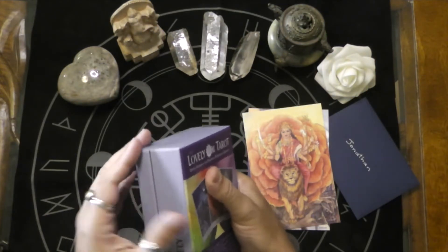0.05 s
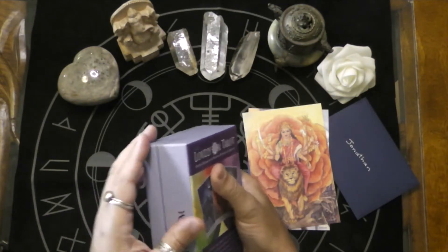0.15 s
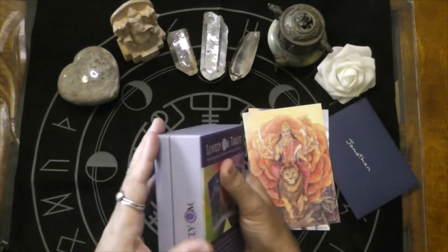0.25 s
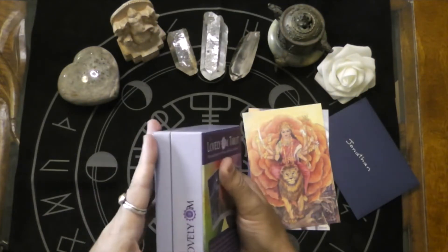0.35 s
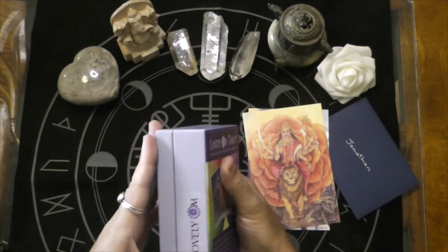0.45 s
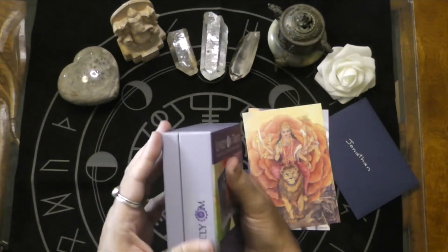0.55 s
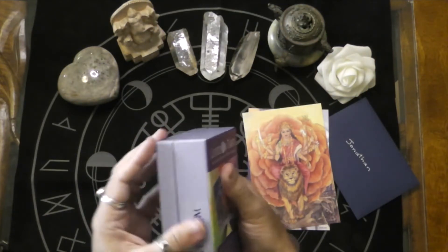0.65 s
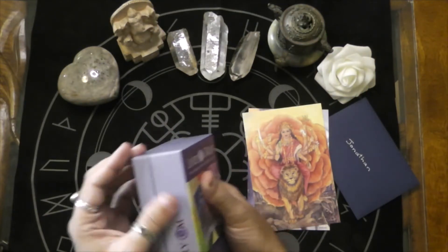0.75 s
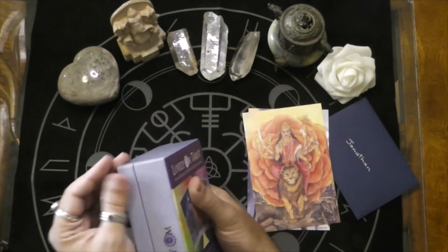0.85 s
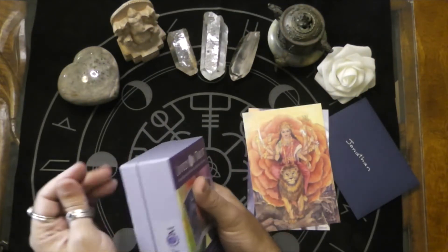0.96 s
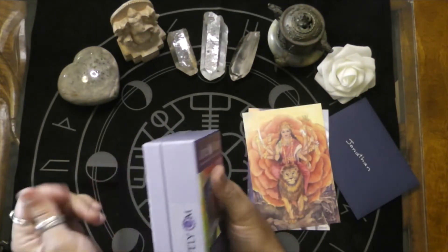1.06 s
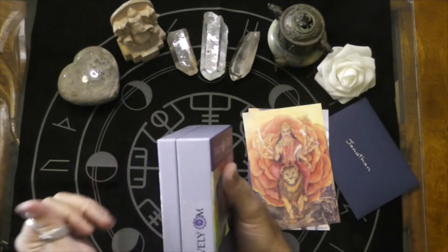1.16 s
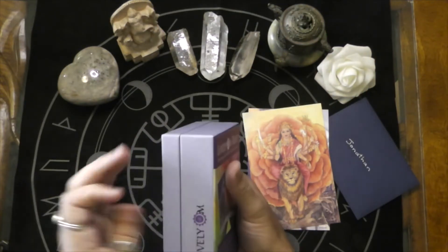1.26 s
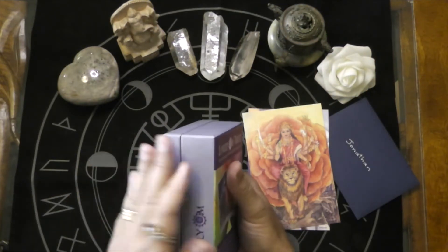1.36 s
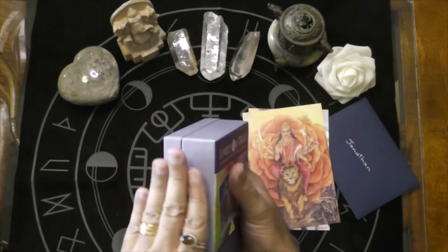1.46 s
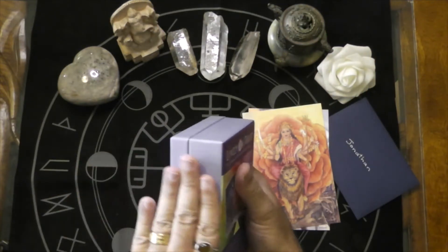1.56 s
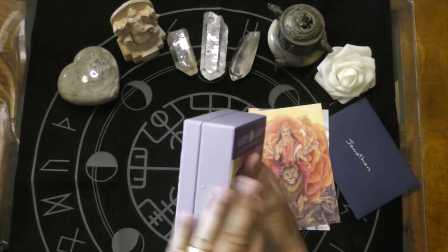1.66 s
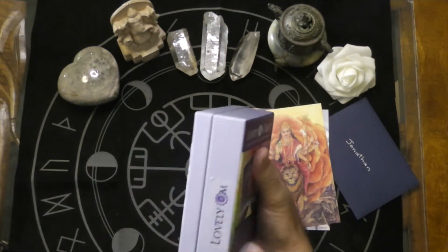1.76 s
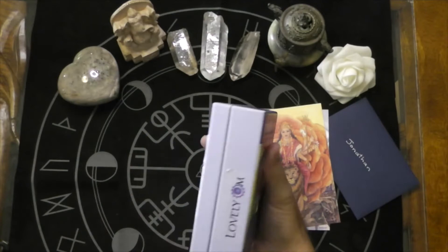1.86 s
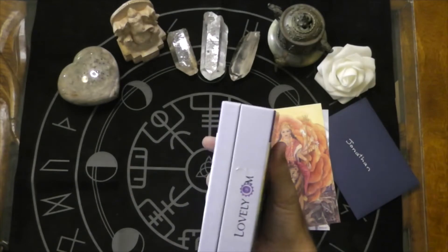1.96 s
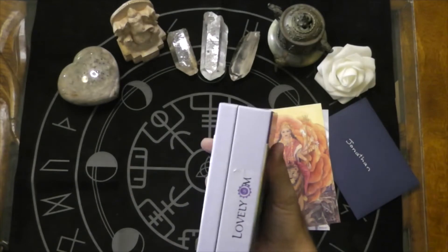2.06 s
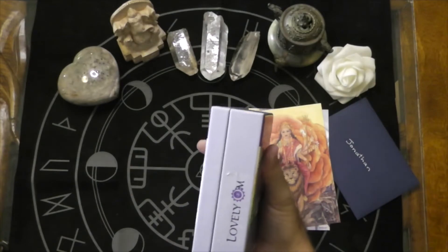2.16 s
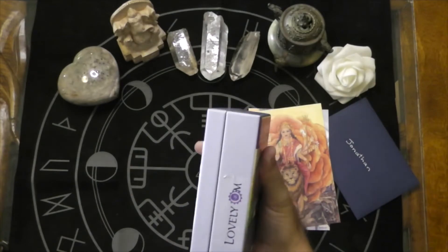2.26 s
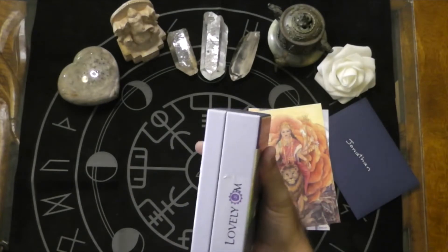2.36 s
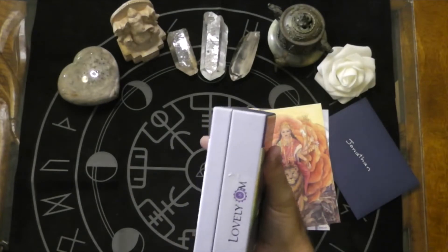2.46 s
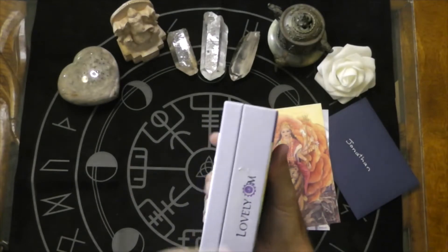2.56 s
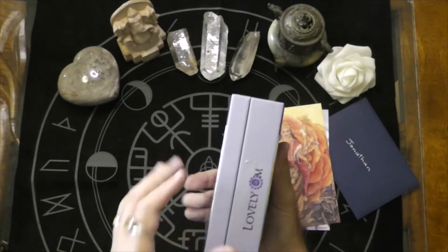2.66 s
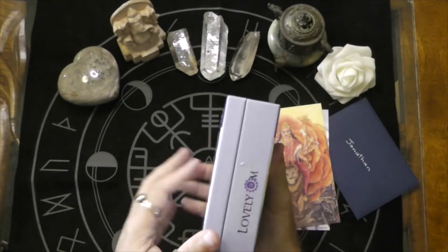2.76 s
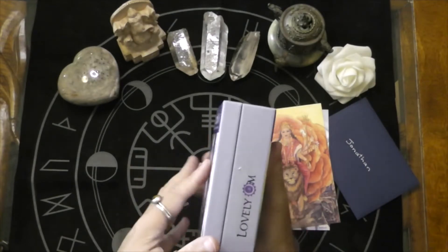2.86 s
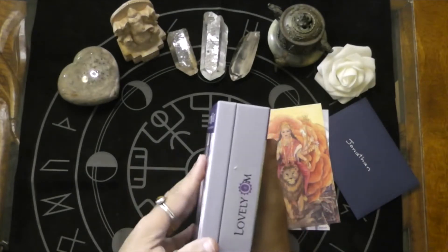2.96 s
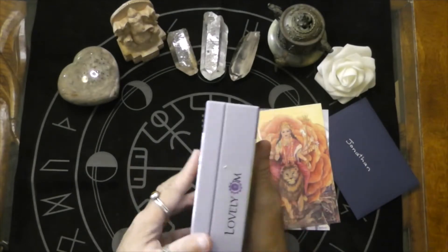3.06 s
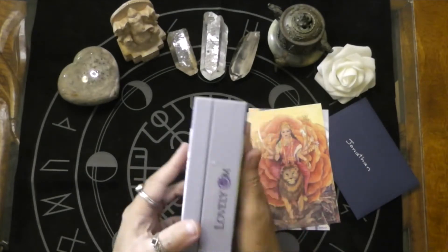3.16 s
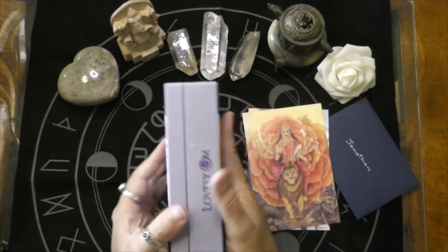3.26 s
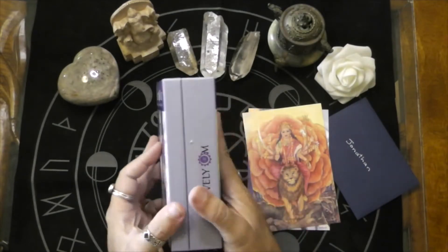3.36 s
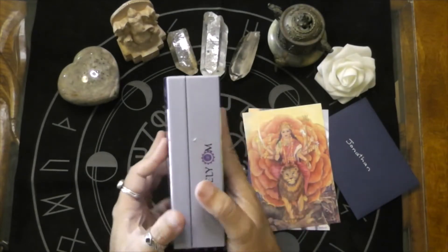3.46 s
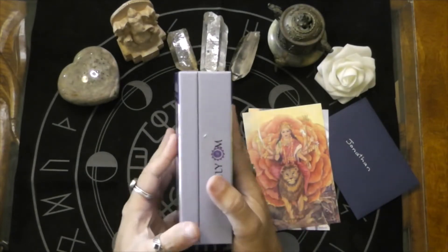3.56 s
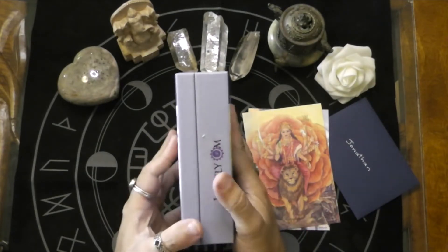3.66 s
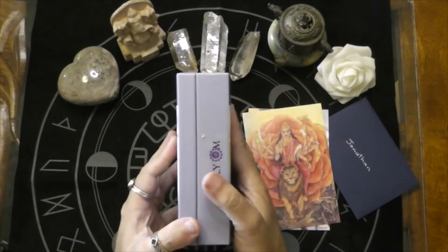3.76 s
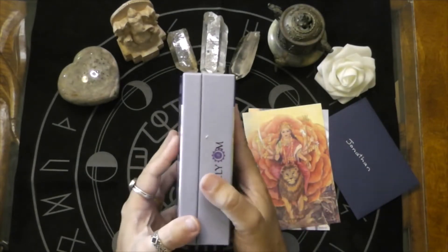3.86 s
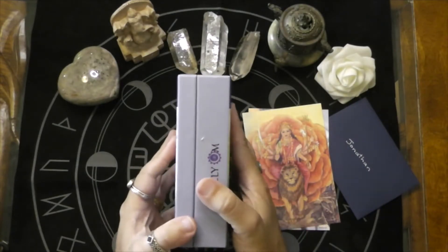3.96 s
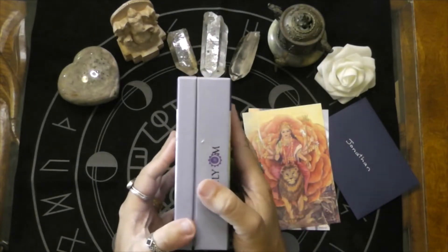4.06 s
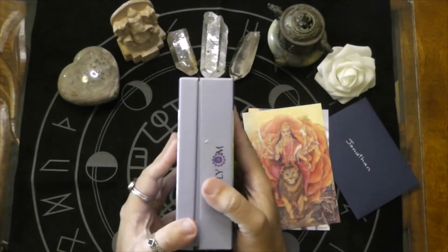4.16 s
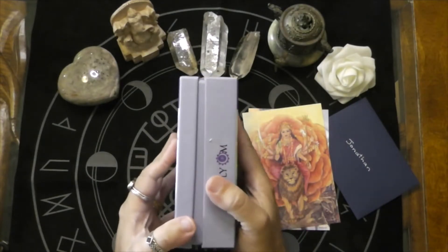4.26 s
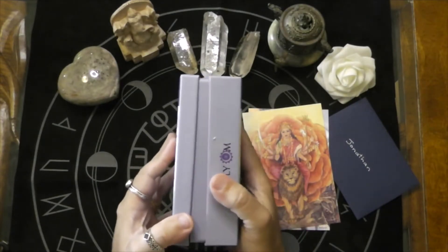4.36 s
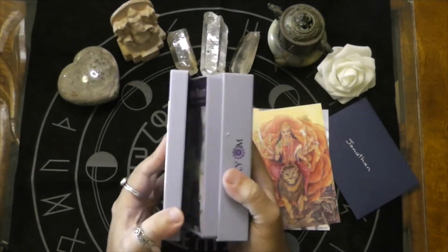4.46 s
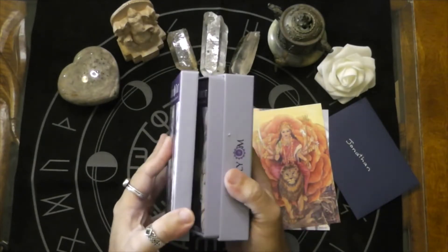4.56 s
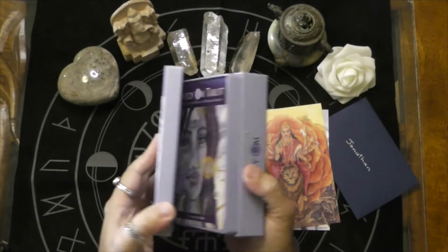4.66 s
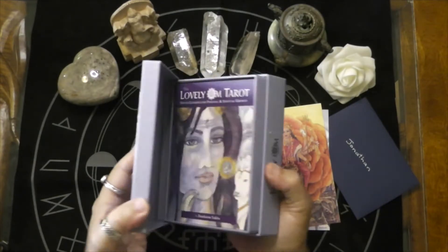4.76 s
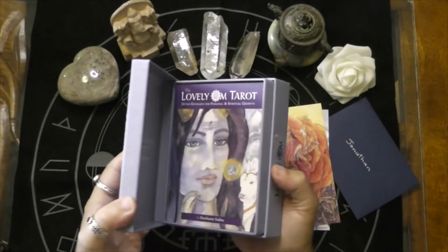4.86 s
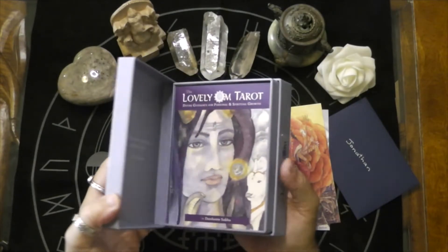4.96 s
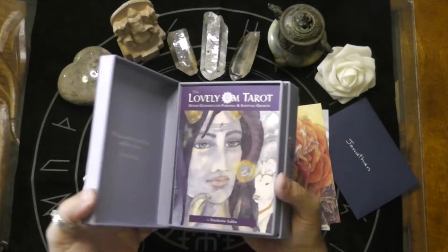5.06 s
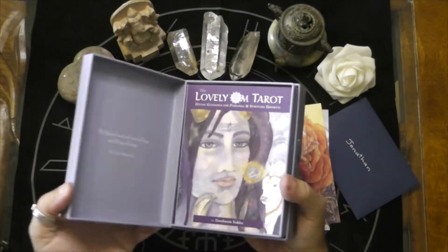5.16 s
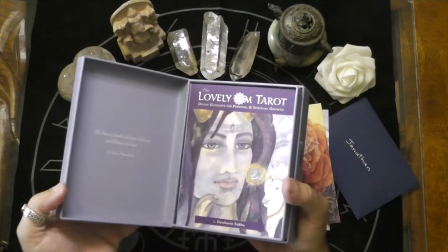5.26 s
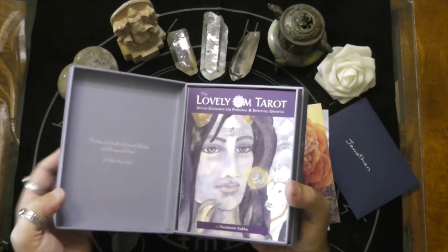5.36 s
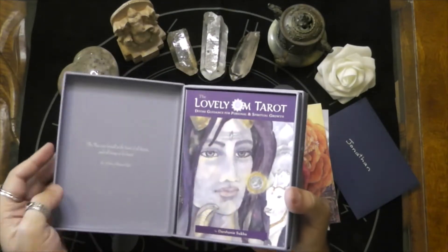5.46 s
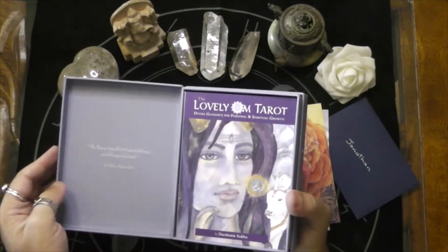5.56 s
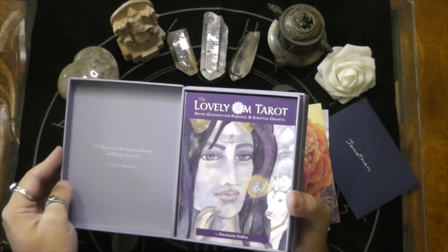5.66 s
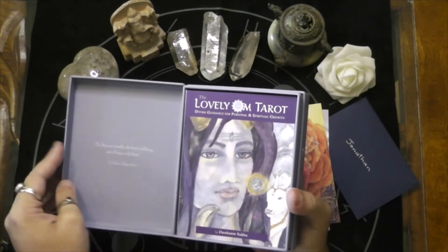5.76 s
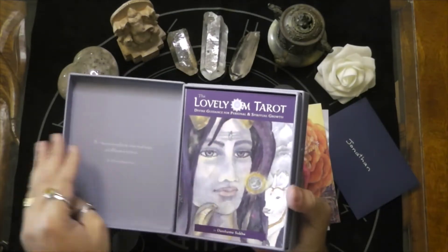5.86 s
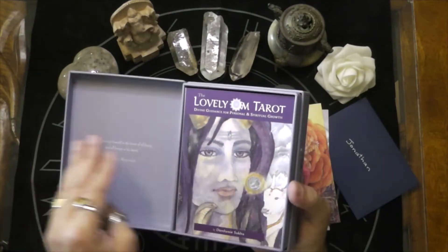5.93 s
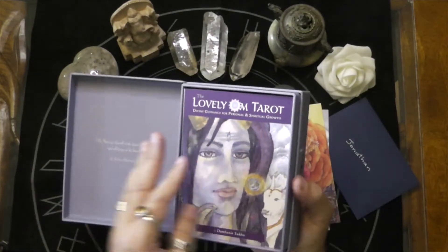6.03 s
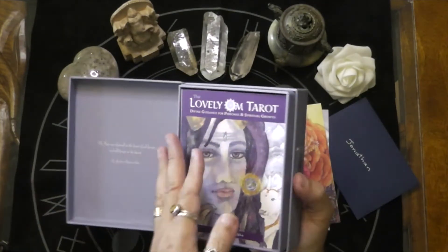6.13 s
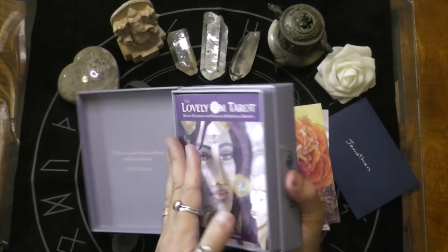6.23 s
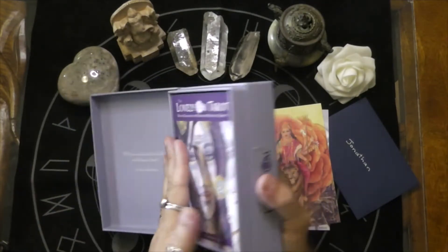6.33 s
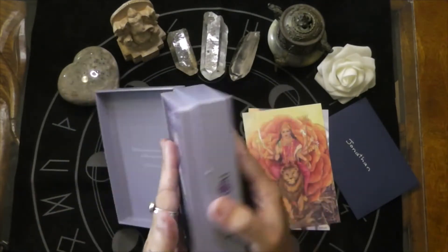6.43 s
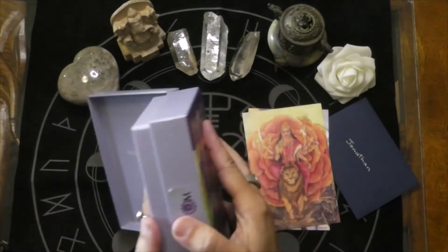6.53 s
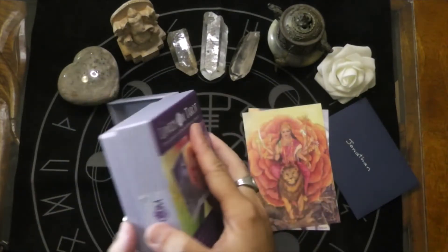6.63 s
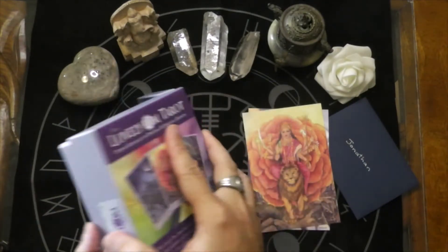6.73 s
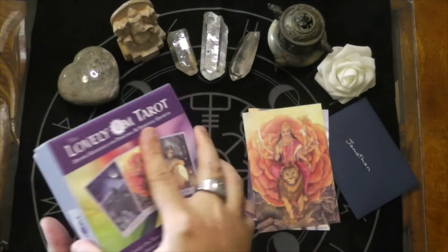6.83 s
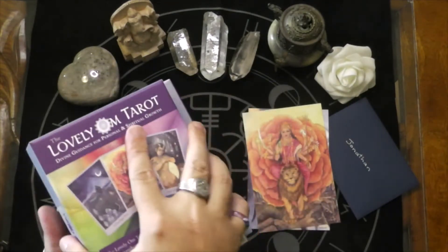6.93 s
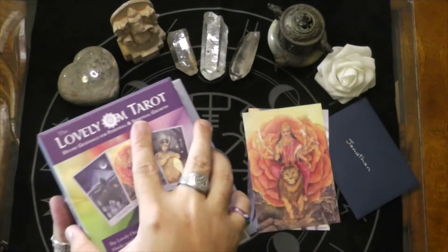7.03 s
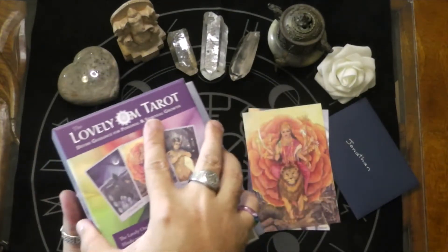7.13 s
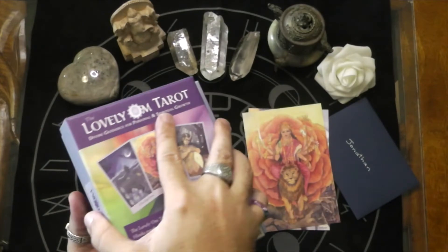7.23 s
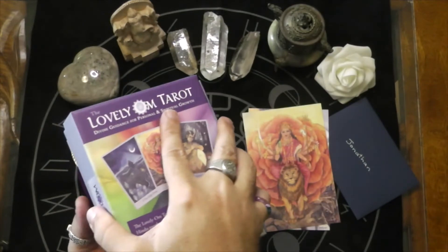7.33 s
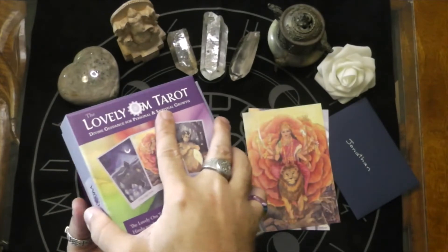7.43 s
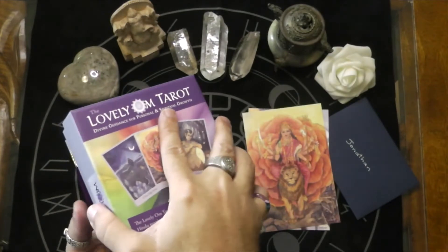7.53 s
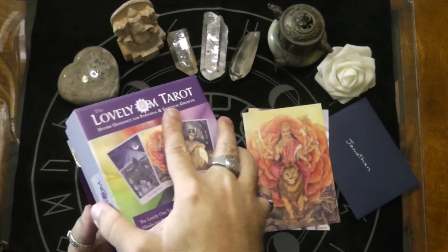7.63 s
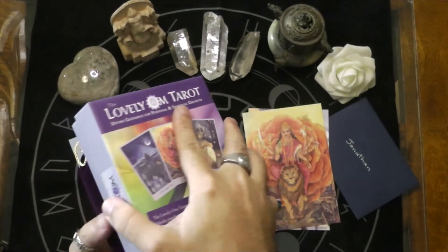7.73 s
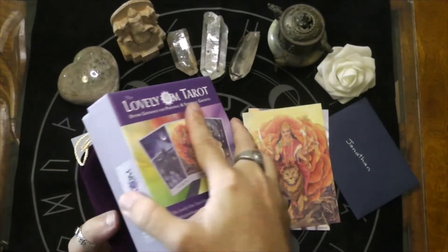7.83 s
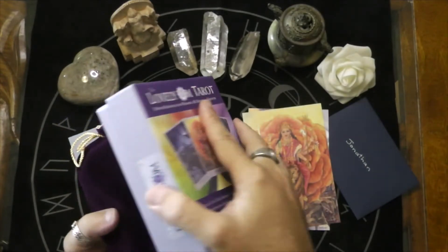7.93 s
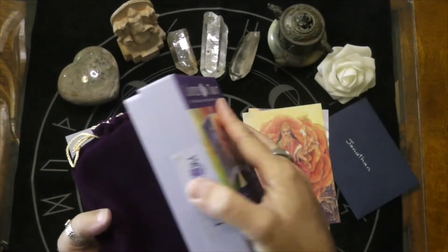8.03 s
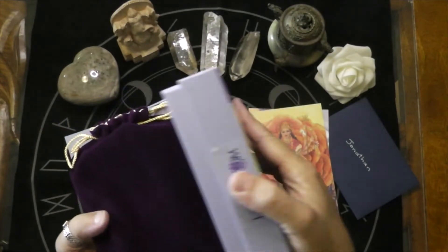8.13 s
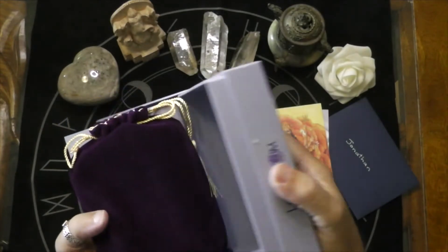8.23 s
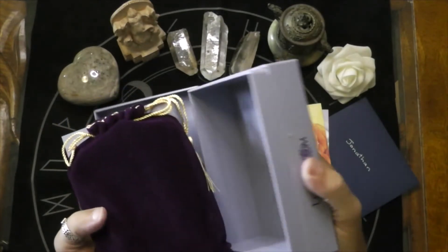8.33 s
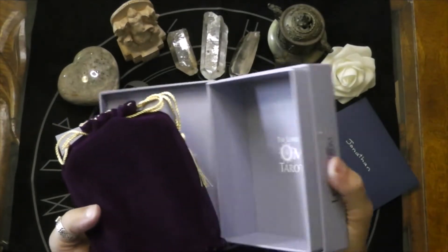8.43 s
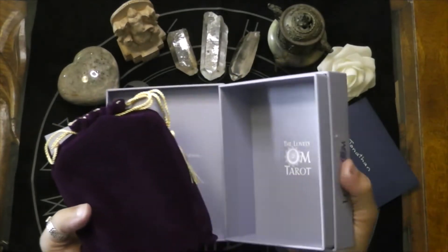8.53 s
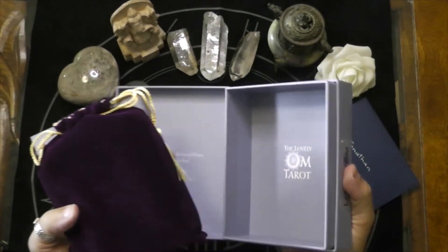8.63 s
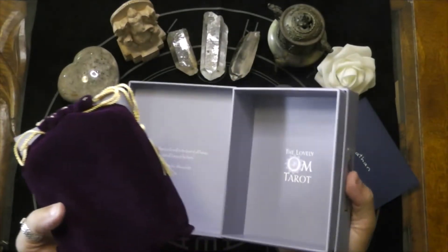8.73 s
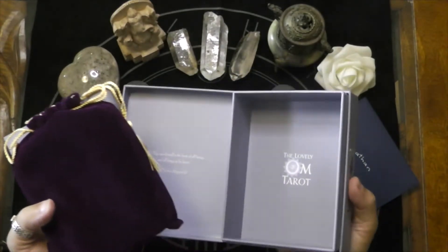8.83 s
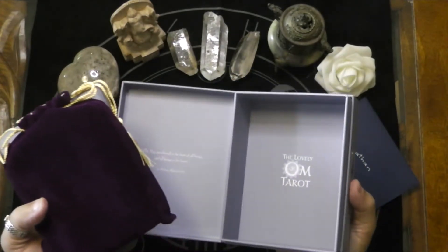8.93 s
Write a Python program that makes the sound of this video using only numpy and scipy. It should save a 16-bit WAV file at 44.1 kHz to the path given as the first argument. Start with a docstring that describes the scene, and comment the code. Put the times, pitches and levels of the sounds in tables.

```python
"""A small room, a cloth-covered table: hands turn a stiff cardboard deck box, open it and tip it out.
Skin hisses and rasps over the laminate in tiny slips; board scuffs on board and squeaks faintly.
Fingers knock the box into ringing, nails tick, and once the deck drops on the lid with a hollow clop.
Behind it a fan hums and a deep rumble swells for a while."""
import sys
import numpy as np
from scipy import signal
from scipy.fft import rfft, irfft, next_fast_len
from scipy.io import wavfile

SR = 44100
rng = np.random.default_rng(int(sys.argv[2]) if len(sys.argv) > 2 else 0)


def materialize(psi):
    """Save the field psi as 16-bit PCM at rate SR to the path in sys.argv[1].

    A 1-D psi becomes a single channel; in a 2-D psi each row is a channel.
    """
    bounded = np.clip(np.atleast_2d(psi).T, -1, 1)
    quanta = np.round(bounded * 32767).astype(np.int16)
    wavfile.write(sys.argv[1], SR, quanta)


N = 396459
TIME = np.arange(N) / SR
LEFT_RIGHT = np.array([[1], [-1]])
# Room air. Each row: frequency in Hz, left-right correlation.
ROOM_CORRELATION = [(30, 0.82), (70, 0.62), (300, 0.81), (640, 0.65), (1400, 0.37), (3100, 0.028),
                    (15000, 0.019)]


def skin_slide():
    """Skin on laminate: dense slips hiss, sparser ones rasp under pressure, lone catches scratch."""
    # Each row: start in seconds, length in seconds, hiss in dB, pressure as rasp over hiss in dB.
    strokes = [(0.161, 0.18, -51.5, -5.5), (0.346, 0.085, -53, -1), (0.517, 0.37, -52, -5),
               (1.04, 0.11, -56.5, -6), (1.192, 0.084, -54.5, -7), (1.416, 0.033, -48.5, 2.5),
               (1.454, 0.057, -46.0, -8), (1.568, 0.18, -41, -9), (2.343, 0.032, -65.0, 1.0),
               (2.486, 0.043, -60, -1), (2.558, 0.14, -56.5, 0), (2.772, 0.152, -57.5, -3.5),
               (2.911, 0.086, -54.5, -0.5), (3.03, 0.32, -55.5, -3.5), (3.122, 0.112, -43.5, -19),
               (3.426, 0.2, -66, 1.5), (3.763, 0.037, -53, -4), (4.137, 0.162, -70.5, 3.0),
               (4.323, 0.16, -64.5, 0), (4.635, 0.088, -61, 2.5), (4.727, 0.098, -57, -1),
               (4.866, 0.11, -56.5, -0.5), (4.987, 0.275, -65, 3.5), (5.362, 0.15, -55.5, -3.5),
               (5.73, 0.23, -65, -1), (5.997, 0.077, -55.5, -1.5), (6.12, 0.15, -55, -5),
               (6.333, 0.14, -53.5, 3), (6.548, 0.18, -62.5, 6), (6.721, 0.17, -58, 0.0),
               (6.998, 0.3, -62, 1.0), (7.668, 0.15, -67.5, 0), (7.817, 0.3, -64, 0.5),
               (8.4, 0.07, -68.5, 8.5), (8.547, 0.036, -61.5, 9), (8.63, 0.3, -66.5, 1.5)]
    # Friction spectra. Each row: frequency in Hz, density in dB.
    hiss_spectrum = [(2000, -11), (2600, -25), (3200, -21.5), (3700, -8.5), (4350, -7.5), (6700, -4),
                     (8000, -3), (9300, 2.5), (11000, -1.5), (15500, -3.5)]
    rasp_spectrum = [(150, 1), (280, 13), (700, 7.5), (2000, 0), (2750, -3.5), (3500, -2.5), (4600, 1.5),
                     (7000, -1), (9300, -0.5), (11000, -4), (13000, -15), (15500, -29)]
    # The nearby box. Each row: frequency in Hz, left-right correlation.
    correlation = [(300, .9), (1400, .7), (3100, .7), (7000, .86), (15000, .8)]
    hiss_power, rasp_power = from_db(-82) ** 2, from_db(-78) ** 2  # holding hands never keep still
    for start_s, length_s, db, pressure_db in strokes:
        power = (from_db(db) * gesture(start_s, length_s, ease_s=0.0098)) ** 2
        hiss_power += power
        rasp_power += from_db(pressure_db) ** 2 * power
    hiss = coloured(near_echoes(slips(per_s=20000, spread_db=0.7)), hiss_spectrum, correlation)
    rasp = coloured(near_echoes(slips(per_s=3800, spread_db=3.0)), rasp_spectrum, correlation)
    scratch = coloured(near_echoes(slips(per_s=54, spread_db=6.5)), hiss_spectrum, correlation)
    hiss = np.sqrt(linger(hiss_power)) * hiss
    rasp = np.sqrt(linger(rasp_power)) * (rasp + from_db(-17) * scratch)
    glide_db = -49  # slow skin grips unevenly; above this hiss level it starts to glide
    sticking = 1 / np.sqrt(1 + hiss_power / from_db(glide_db) ** 2)
    grip_db = 2.5 * sticking * drift(rate_hz=54)
    return from_db(grip_db) * (hiss + rasp)


def deck_drop():
    """The flat deck lands on a cushion of air and settles: soft, heavy blows with no treble."""
    # Each row: time in seconds, level in dB, contact cut-off in Hz.
    blows = [(6.2973, -23, 1540), (6.2999, -9, 1040), (6.3065, -24, 1070), (6.309, -23, 1090),
             (6.3206, -27, 786)]
    out, impulse = np.zeros(N), signal.unit_impulse(SR // 2)
    for at_s, db, cutoff_hz in blows:
        blow = box_ring(low_pass(impulse, cutoff_hz, order=8), uneven_db=0.5)
        add(out, at_s - .0005, from_db(db) * blow / np.abs(blow).max())
    return out


def knocks():
    """Fingers and contents ring the box; the softer the push, the lower its spectrum."""
    # Each row: time in seconds, level in dB, nominal brightness in Hz.
    contacts = [(0.0918, -49.5, 1280), (0.094, -40, 285), (0.1807, -42, 500), (0.5201, -46, 393),
                (0.5373, -42, 388), (0.9081, -44, 1260), (1.4, -48, 730), (1.4295, -33.5, 473),
                (1.4535, -47, 407), (1.4667, -42, 413), (1.7436, -38, 660), (2.626, -48, 330),
                (2.8461, -45.5, 259), (3.0276, -48.5, 286), (3.755, -44.5, 263), (4.767, -47.5, 780),
                (4.9363, -47.5, 700), (5.031, -45.5, 880), (5.1917, -52, 1480), (5.342, -49, 505),
                (5.8421, -50.5, 690), (6.1955, -53, 1010), (6.4264, -49, 1700), (6.4329, -42, 557),
                (6.46, -44.5, 212), (6.5694, -45, 656), (6.812, -49, 280), (7.297, -47, 790)]
    out, impulse = np.zeros(N), signal.unit_impulse(SR // 4)
    for at_s, db, hz in contacts:
        push = low_pass(resonance(impulse, hz * 0.85, width_hz=hz * 0.58), hz * 2.0, order=2)
        knock = box_ring(push, uneven_db=1.0)
        add(out, at_s, from_db(db) * knock / np.std(knock[:SR // 70]))
    return out


def ticks(rattle_db):
    """Nails, rings and card edges: a brief crack, a snap of the board and a faint rattle behind."""
    # Each row: time in seconds, level in dB, nominal brightness in Hz.
    contacts = [(0.0235, -51, 9100), (0.0919, -38.5, 8200), (0.1405, -45.5, 9300), (0.227, -45, 7600),
                (0.371, -47.5, 7200), (0.4816, -53, 8000), (0.9082, -54, 7000), (1.2303, -47, 9900),
                (1.2916, -44, 7800), (1.316, -51.5, 9000), (1.3984, -39.5, 9350), (1.4274, -34.5, 4470),
                (2.463, -42.5, 10600), (2.5813, -46, 8850), (2.6255, -47, 7800), (2.7413, -36, 9600),
                (4.161, -41.5, 10300), (4.337, -54, 9000), (4.6863, -41, 10700), (5.033, -50, 6500),
                (5.8074, -44, 9000), (6.051, -39.5, 9950), (6.0561, -43, 9150), (6.4277, -39.5, 5900),
                (6.6685, -48, 6300), (8.5765, -51, 7900)]
    crack_s, rattle_s, snap_hz = .0007, .006, 1730
    out, t = np.zeros(N), TIME[:SR // 20]
    envelope = np.exp(-t / crack_s) + from_db(rattle_db) * np.exp(-t / rattle_s)
    for at_s, db, hz in contacts:
        crack = rng.standard_normal(len(t)) * envelope
        snap_db = 3 - 7 * np.log2(hz / snap_hz)  # brighter contacts snap less
        snap = from_db(snap_db) * resonance(crack, snap_hz, width_hz=2800)
        low_hz = max(hz - 3400, 1800)  # softer contacts reach lower
        crack = signal.sosfilt(signal.butter(3, low_hz, "high", fs=SR, output="sos"), crack)
        tick = low_pass(crack + snap, hz * 1.2, order=2)
        add(out, at_s, from_db(db) * tick / np.std(tick[:SR // 440]))
    return out


def board_scuffs():
    """Coarse slips of board on board shake the box's upper modes."""
    # Each row: start in seconds, length in seconds, level in dB.
    drags = [(0.764, 0.056, -49), (0.838, 0.16, -56), (1.378, 0.273, -63), (2.57, 0.079, -57),
             (3.038, 0.18, -60), (4.14, 0.19, -60), (4.739, 0.052, -55.5), (4.929, 0.15, -53.5),
             (5.063, 0.14, -60), (5.834, 0.016, -54), (6.187, 0.021, -45.5), (6.383, 0.12, -52),
             (6.537, 0.13, -53), (6.655, 0.149, -58), (7, 0.21, -56), (7.247, 0.059, -62), (7.64, 0.3, -61),
             (8.559, 0.031, -49.5), (8.81, 0.18, -61)]
    force = resonance(slips(per_s=1300, spread_db=2.0), hz=930, width_hz=900)
    force = resonance(force, hz=920, width_hz=1530)
    mid, side = rms_one(box_ring(force, uneven_db=0))
    power = from_db(-68.5) ** 2  # the held box always flexes a little
    for start_s, length_s, db in drags:
        power += (from_db(db) * gesture(start_s, length_s, ease_s=0.0031)) ** 2
    return np.sqrt(power) * (mid + 0.21 * side * LEFT_RIGHT)


def squeaks(width_hz):
    """Board sticks and slips on board nearly in step, and sings for a moment."""
    # Each row: centre in seconds, Gaussian half-width in seconds, pitch in Hz, level in dB.
    bursts = [(7.117, 0.02, 1760, -55.5), (7.697, 0.01, 760, -49), (7.849, .012, 720, -52),
              (8.444, 0.011, 1680, -59)]
    out, t = np.zeros(N), TIME[:SR // 5] - .1
    for centre_s, half_s, hz, db in bursts:
        band = resonance(rng.standard_normal(len(t)), hz, width_hz)
        tone = rms_one(resonance(band, hz, width_hz))
        add(out, centre_s + t[0], from_db(db) * tone * np.exp(-(t / half_s) ** 2 / 2))
    return out


def box_ring(force, uneven_db):
    """The box rings in its modes, each as strongly as the place of contact allows."""
    # Each row: frequency in Hz, gain in dB, T60 in seconds.
    modes = [(192, -15, 0.05), (282.3, -3, 0.12), (383, 1, 0.077), (465, -1, 0.052), (530, -8.5, 0.036),
             (601.5, -4.5, 0.086), (711, 1.5, 0.037), (821, -1.5, 0.034), (983, -8, 0.072),
             (1048, -7.5, 0.033), (1195, -3, 0.045), (1366, 1, 0.013), (1760, 5, 0.0073), (1980, -18, 0.14)]
    out = 0
    for (hz, db, t60_s), chance in zip(modes, rng.standard_normal(len(modes))):
        r, w = from_db(-60 / (t60_s * SR)), 2 * np.pi * hz / SR
        ring = signal.lfilter([1, 0, -1], [1, -2 * r * np.cos(w), r * r], force + 1e-18)
        out += from_db(db + uneven_db * chance) * ring
    return out


def fan(air_db, waver_db):
    """Rushing air, and a wavering hum from the rotation."""
    # Each row: frequency in Hz, density in dB.
    air_spectrum = [(20, -17), (45, -3.5), (80, -11.5), (150, -7.5), (270, -7), (450, -9.5), (800, -12.5),
                    (1250, -16), (2150, -26), (2450, -35.5), (3200, -37.5), (4700, -29.5), (9000, -33.5),
                    (16000, -45)]
    # Each row: frequency in Hz, level in dB.
    hum_lines = [(59, -68), (119, -68.5), (177, -68.5), (295, -63), (413, -61), (472, -65), (662, -71)]
    out = from_db(air_db) * coloured(rng.standard_normal((2, N)), air_spectrum, ROOM_CORRELATION)
    wavering_s = TIME + 0.00033 * drift(rate_hz=5)
    for hz, db in hum_lines:
        amplitude = np.sqrt(2) * from_db(db + waver_db * drift(rate_hz=7))
        out += amplitude * np.sin(2 * np.pi * (hz * wavering_s + rng.random()))
    return out


def rumble():
    """Deep noise, stronger on the right, that swells around 7 s."""
    # Each row: time in seconds, level in dB.
    swell = [(0, -56), (5.9, -56), (6.3, -54.5), (7.0, -50.5), (7.7, -51.5), (8.2, -57), (8.99, -56)]
    # Each row: frequency in Hz, density in dB.
    spectrum = [(15, -5), (31, -5.5), (45, -15), (80, -18.5), (200, -59), (1000, -110)]
    level_db = np.interp(TIME, *np.transpose(swell)) - LEFT_RIGHT
    return from_db(level_db) * coloured(rng.standard_normal((2, N)), spectrum, ROOM_CORRELATION)


def near_echoes(x):
    """Reflections from the table and hands comb the sound."""
    # Each row: delay in seconds, gain in dB.
    echoes = [(.0028, -8.5), (.0062, -12)]
    return x + sum(from_db(db) * np.roll(x, int(delay_s * SR), axis=-1) for delay_s, db in echoes)


def room(x, wet_db, build_s):
    """Diffuse reflections build up and die band by band, partly alike left and right."""
    # Each row: frequency in Hz, T60 in seconds.
    decay_times = [(150, 0.29), (500, 0.26), (1500, 0.23), (5000, 0.13), (14000, 0.23)]
    t, edges_hz = TIME[:SR // 2], np.geomspace(80, 18000, 9)
    tail = 0
    for low_hz, high_hz in zip(edges_hz, edges_hz[1:]):
        band = signal.butter(2, [low_hz, high_hz], "band", fs=SR, output="sos")
        mid, side = signal.sosfilt(band, rng.standard_normal((2, len(t))))
        t60_s = at_hz(decay_times, np.sqrt(low_hz * high_hz))
        tail += (mid + .5 * side * LEFT_RIGHT) * from_db(-60 * t / t60_s)
    tail *= 1 - np.exp(-(t / build_s) ** 2)
    tail /= np.sqrt(np.sum(tail ** 2) / 2)
    return x + from_db(wet_db) * signal.fftconvolve(x[None], tail, axes=1)[:, :N]


def slips(per_s, spread_db):
    """Friction as two streams of tiny slips of uneven size."""
    sizes = from_db(spread_db * np.minimum(rng.exponential(1, (2, N)), 4))
    return rms_one(rng.standard_normal((2, N)) * sizes * (rng.random(N) < per_s / SR))


def gesture(start_s, length_s, ease_s):
    """One hand movement: ease in, hold speed, ease out."""
    def ease(t):
        return .5 + .5 * np.tanh(.5 * t / ease_s)
    return ease(TIME - start_s) * ease(start_s + length_s - TIME)


def linger(power, tail_db=-6, decay_s=0.052):
    """The sound hangs on briefly behind a stroke."""
    pole = np.exp(-2 / (decay_s * SR))
    return power + from_db(tail_db) ** 2 * signal.lfilter([1 - pole], [1, -pole], power)


def coloured(pair, spectrum, correlation):
    """Two independent signals to stereo with this spectrum and correlation; rms 1."""
    size = next_fast_len(N, True)
    hz = np.arange(size // 2 + 1) * SR / size
    mid, side = rfft(pair, size) * from_db(at_hz(spectrum, hz)) * (hz > 10)
    alike = np.clip(at_hz(correlation, hz), 0, 1)
    stereo = np.sqrt(1 + alike) * mid + np.sqrt(1 - alike) * side * LEFT_RIGHT
    return rms_one(irfft(stereo, size)[:, :N])


def resonance(x, hz, width_hz):
    """Two-pole band-pass, peak gain 1."""
    r, w = np.exp(-np.pi * width_hz / SR), 2 * np.pi * hz / SR
    return signal.lfilter(np.array([1, 0, -1]) * (1 - r * r) / 2, [1, -2 * r * np.cos(w), r * r], x)


def low_pass(x, hz, order):
    return signal.sosfilt(signal.butter(order, min(hz, SR * .45), fs=SR, output="sos"), x)


def drift(rate_hz):
    """Slow random curve, spread near 1."""
    knots = rng.standard_normal(N // 16)
    return np.interp(TIME * rate_hz, np.arange(len(knots)), knots)


def at_hz(rows, hz):
    """Read a table on a log-frequency axis."""
    row_hz, values = np.transpose(rows)
    return np.interp(np.log(hz + 1), np.log(row_hz), values)


def add(track, at_s, sound):
    at = int(at_s * SR)
    track[at:at + len(sound)] += sound[:N - at]


def from_db(db):
    return 10 ** (np.asarray(db) / 20)


def rms_one(x):
    return x / np.sqrt(np.mean(x ** 2) + 1e-20)


def scene():
    """Low sounds lean right; skin and ticks sit just left of centre."""
    low = rumble()
    low += room(knocks() + squeaks(width_hz=160), wet_db=-9.5, build_s=0.0042)
    low += room(deck_drop(), wet_db=-14.5, build_s=0.022)
    low += board_scuffs() + fan(air_db=-51.0, waver_db=2.5)
    bright = room(ticks(rattle_db=-17), wet_db=-9, build_s=.005) + skin_slide()
    return low * from_db(-0.87 * LEFT_RIGHT) + bright * from_db(0.51 * LEFT_RIGHT)


def record(dry):
    """Steep cut of the top treble."""
    cutoff_hz = 15900
    return signal.sosfilt(signal.ellip(12, .1, 80, cutoff_hz, fs=SR, output="sos"), dry)


dry = scene()
out = record(dry)
materialize(out)
```